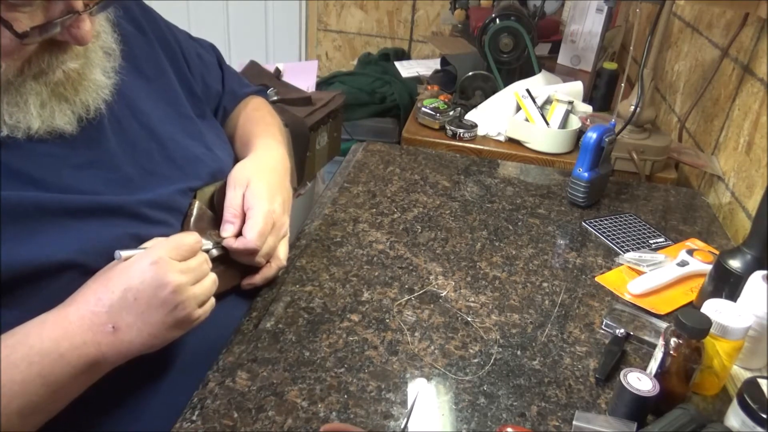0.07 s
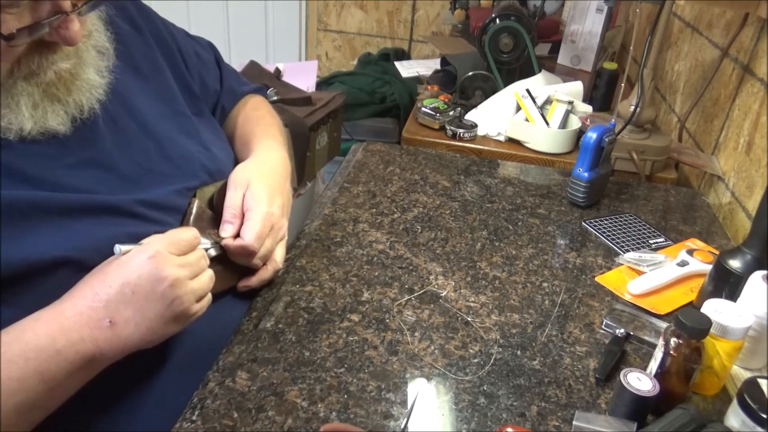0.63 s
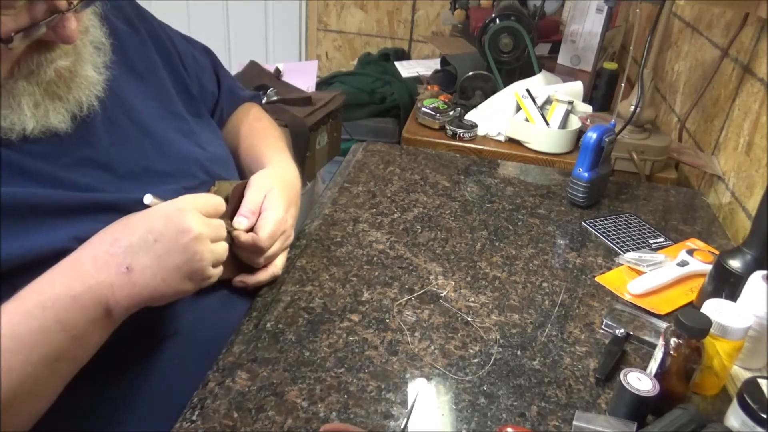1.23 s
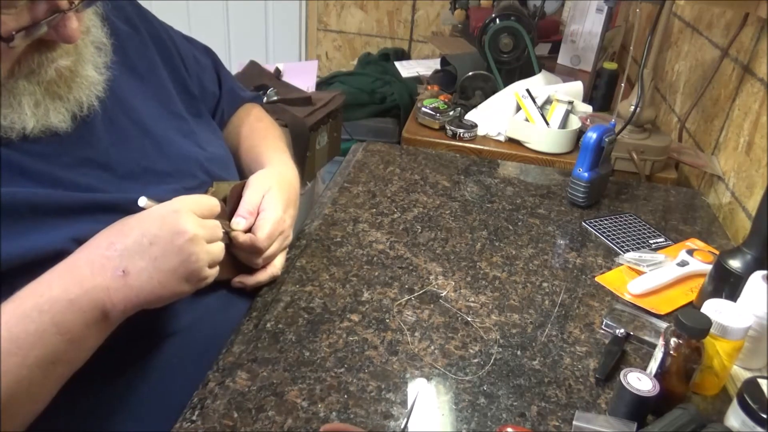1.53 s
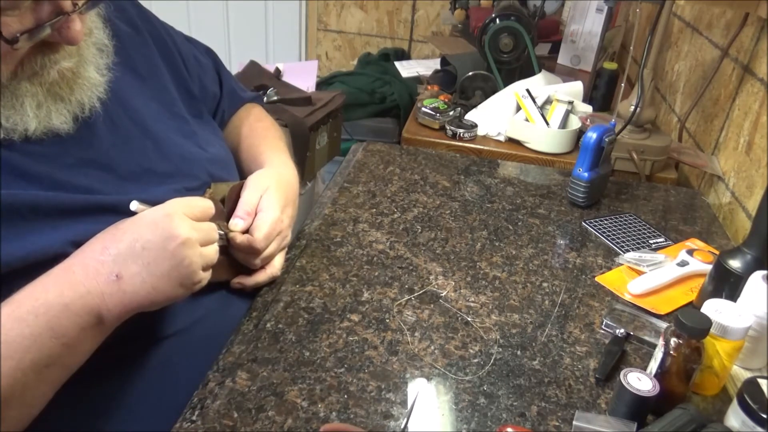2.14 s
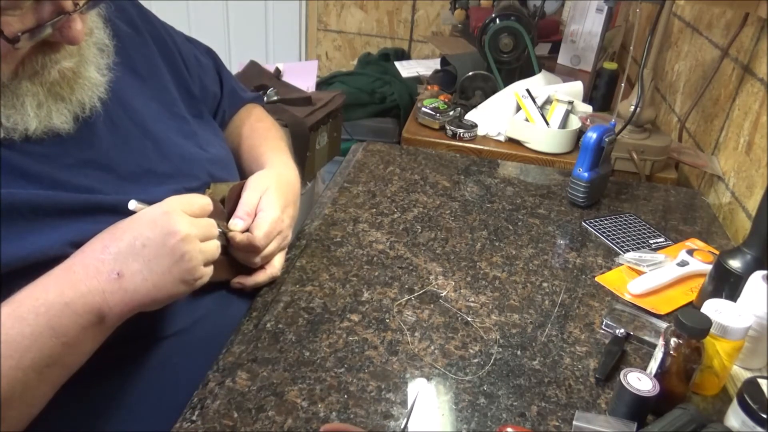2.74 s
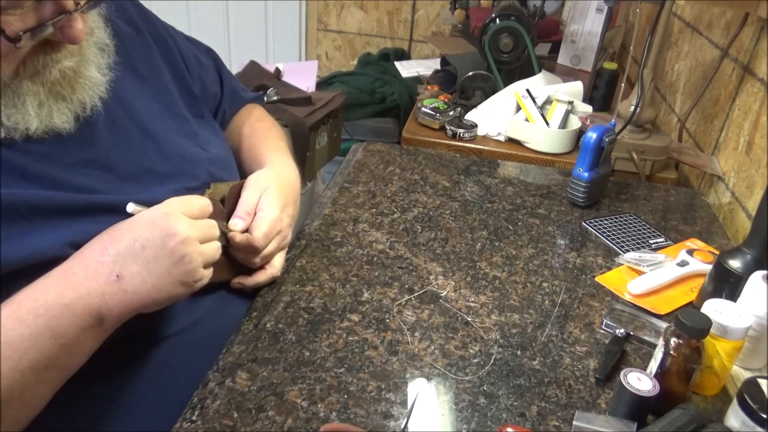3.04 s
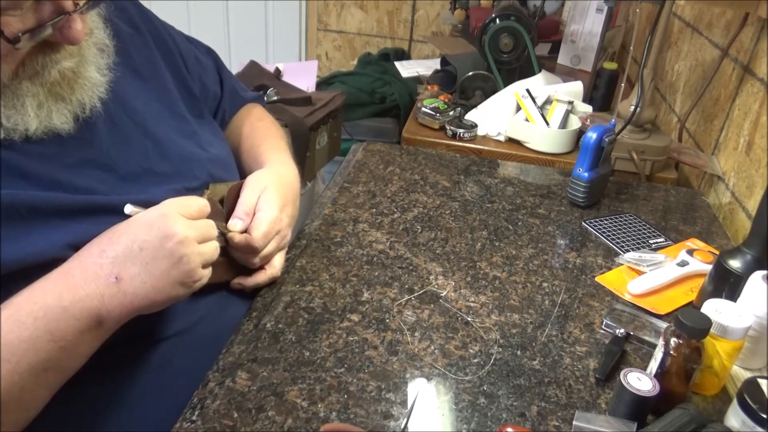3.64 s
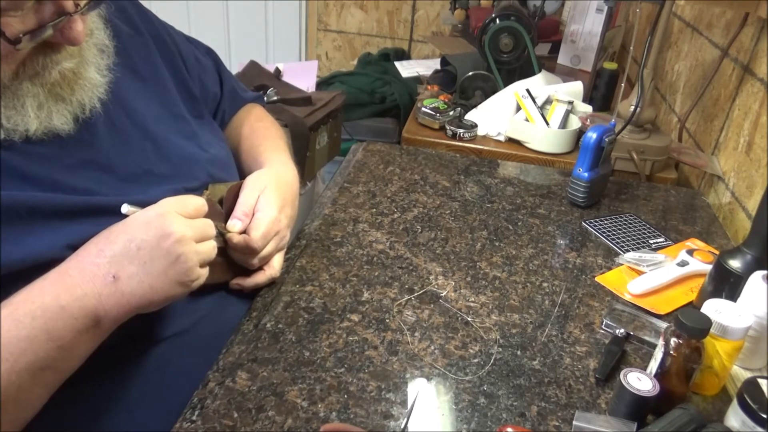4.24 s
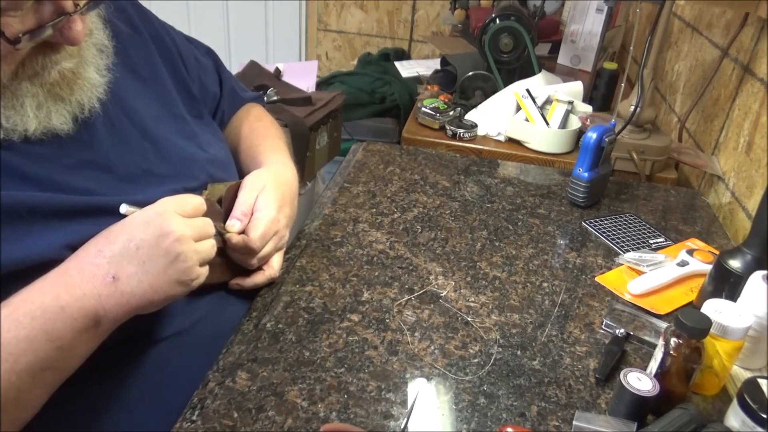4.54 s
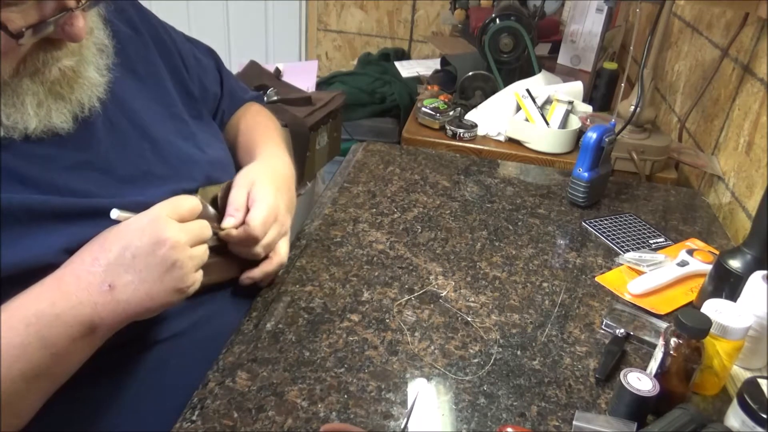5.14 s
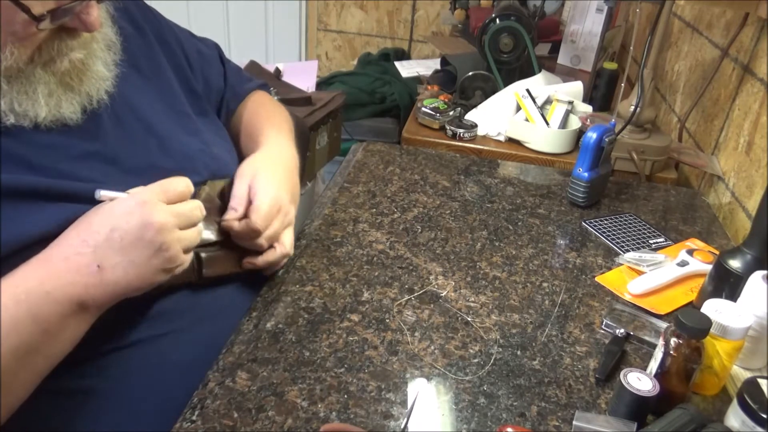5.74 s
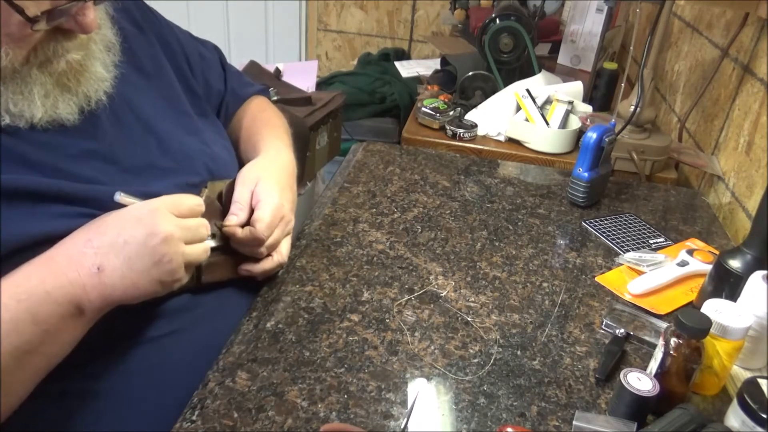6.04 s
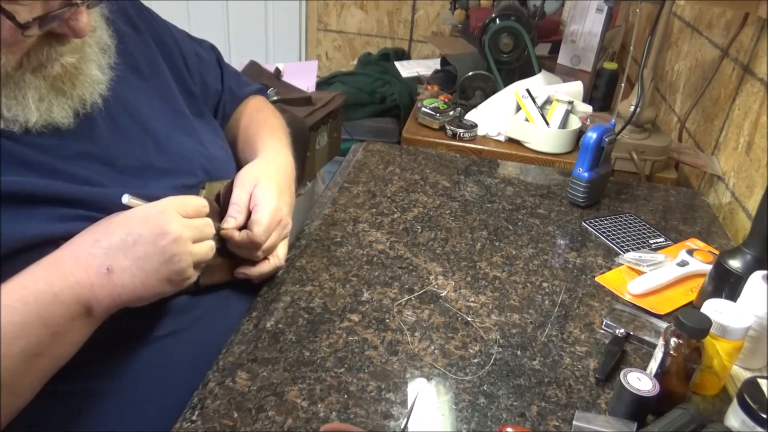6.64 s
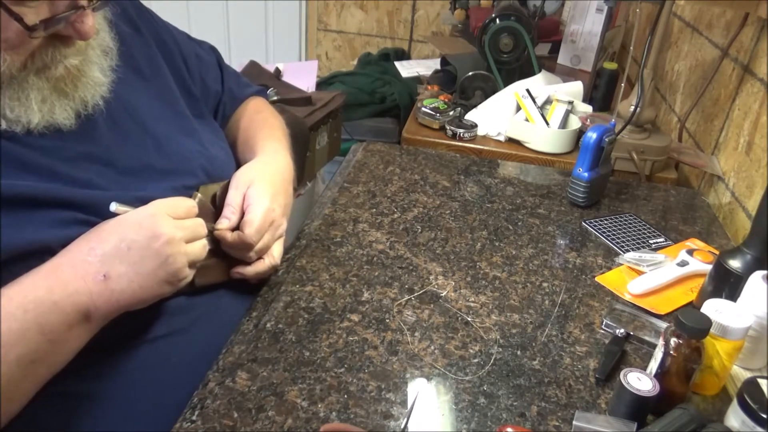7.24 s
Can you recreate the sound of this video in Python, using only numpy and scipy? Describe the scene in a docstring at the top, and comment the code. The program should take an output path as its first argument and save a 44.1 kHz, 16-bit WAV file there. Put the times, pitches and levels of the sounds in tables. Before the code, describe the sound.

Scattered scratchy ticks and several sharp snaps as a blade breaks thread in leather, with light rustling in a small, quiet workshop.

```python
"""A small workshop, at a stone-topped bench: someone unpicks the stitching of a leather piece.
A thin blade sticks and slips over the thread in small dull knocks; now and then a stitch parts
with a sharp snap that rings blade and leather. Hands and leather rub on a shirt.
Behind it: faint hiss, mains hum, a small motor's fluttering whirr and, late, a low drone."""
import sys
import numpy as np
from scipy import signal
from scipy.fft import rfft, irfft
from scipy.io import wavfile

SR = 44100
rng = np.random.default_rng(int(sys.argv[2]) if len(sys.argv) > 2 else 0)


def dump(signal):
    """Clip the signal to [-1, 1] and save it as 16-bit WAV at the path in sys.argv[1]."""
    limited = np.clip(np.atleast_2d(signal).T, -1, 1)
    pcm = np.round(limited * 32767).astype(np.int16)
    wavfile.write(sys.argv[1], SR, pcm)


N = 330308
TIME_S = np.arange(N) / SR

# modes of the held leather, taut thread, blade and blade edge: freq_hz, width_hz, gain_db
LEATHER_MODES = [(462, 91, -14.5), (672, 87.5, -0.5), (780, 97, 0.5), (925, 116, -4.5), (1104, 148, -4),
                 (1796, 137, -8.5)]
THREAD_MODES = [(1940, 90, -2.1), (2520, 430, 0.23), (3140, 340, -2.2), (3660, 360, -2.5)]
BLADE_MODES = [(3170, 490, -13.5), (3990, 790, -9), (4610, 850, -4), (5290, 750, 1), (5697, 730, 0.5),
               (6590, 1230, -10)]
EDGE_MODES = [(7700, 540, -6), (9520, 870, -3.5), (13000, 3300, -12.5)]


def stitch_snaps():
    """A stitch parts: the blade springs free, its edge cracks, the thread twangs, the leather jumps."""
    # stitches and fibres giving way: start_s, ring_db, thump_db, twang_db, crack_db, blade_pitch_ratio
    breaks = [(1.304, -20, -30, -14, -22, 1.1), (1.7988, 1, -8, -9, -8, 1.05),
              (1.8010, 11, 6.5, -16, 8, 0.99), (1.8138, 18, 12, 4, 11.5, 1.04),
              (1.9135, -10, -5, -18, -21, 1.04), (2.5796, -13, -21, -13, -15, 1.0),
              (2.5823, 16, -16, 2, 14, 0.88), (2.584, 22.5, 12, 6, 20, 1),
              (2.9394, 9.5, -0.5, -8.5, 4, 1.005), (3.8268, 20.5, 10, 6.5, 13.5, 0.97),
              (3.8557, -3, -15, -11, -1, 0.93), (3.8576, 5, 9.5, -2.5, 6.5, 1.2),
              (7.3301, 5, -3, -5, -9, 1.24), (7.3344, 24.5, 17.5, 9.5, 10.5, 0.9)]
    out = np.zeros(N)
    for start_s, ring_db, thump_db, twang_db, crack_db, pitch_ratio in breaks:
        force = release(fray=0.39, fray_s=0.0045)
        blade_chirp = disperse(force, hz=4830, width_hz=1880, stages=2)
        edge_chirp = disperse(force, hz=11000, width_hz=1400, stages=3)
        ring = from_db(ring_db) * low_cut(resonate(blade_chirp, BLADE_MODES, pitch_ratio), hz=2020)
        crack = from_db(crack_db) * low_cut(resonate(edge_chirp, EDGE_MODES), hz=4530)
        twang = from_db(twang_db) * low_cut(resonate(force, THREAD_MODES), hz=920)
        thump = from_db(thump_db) * low_cut(resonate(force, LEATHER_MODES), hz=377)
        add(out, start_s, ring + crack + twang + thump)
    return out


def blade_slips(knock_gain_db, scratch_gain_db, steel_gain_db):
    """Stick-slip: each slip knocks the leather, scratches the thread and grazes the steel."""
    # single firm picks at the thread, relative levels: start_s, knock_db, steel_db
    picks = [(0.039, -36, -61), (0.058, -40, -59), (0.078, -38, -57), (0.096, -38.5, -57),
             (0.127, -38, -61), (0.169, -37, -56), (0.206, -38, -61), (0.265, -40, -62),
             (0.325, -39.5, -48), (0.403, -40.5, -52), (0.421, -37, -49), (0.457, -36.5, -50),
             (0.503, -42, -41), (0.636, -37.5, -44), (0.667, -37, -60), (0.737, -41, -42.5),
             (1.099, -56, -44.5), (1.321, -39, -37), (2.168, -34.5, -49), (2.401, -39, -62),
             (2.5, -38.5, -39), (2.996, -41, -53), (3.021, -46, -48.5), (3.342, -56, -43),
             (3.5, -41.5, -35), (3.604, -45, -49), (4.103, -43.5, -52), (4.503, -44.5, -44),
             (5.186, -46, -37), (5.22, -45.5, -33.5), (6.083, -38.5, -57), (6.411, -37, -58),
             (6.462, -41, -48), (6.609, -42.5, -49), (6.738, -40.5, -55), (7.251, -41.5, -47)]
    out = np.zeros(N)
    for start_s, knock_db, steel_db in list(picks) + drag_slips():
        force = release(fray=0.39, fray_s=0.0016)
        graze = release(fray=2.2, fray_s=0.0015)
        grip_ratio = np.exp(0.035 * rng.standard_normal())  # fingers retune leather and thread
        tear = release(fray=2.0, fray_s=0.0023)
        leather = resonate(soft_contact(force, hz=550), LEATHER_MODES, grip_ratio)
        thread = resonate(tear, THREAD_MODES, grip_ratio)
        steel = resonate(graze, BLADE_MODES) + from_db(-2.5) * resonate(graze, EDGE_MODES)
        knock = from_db(knock_db + knock_gain_db) * low_cut(leather, hz=450)
        scratch = from_db(knock_db + scratch_gain_db) * low_cut(thread, hz=1130)
        tick = from_db(steel_db + steel_gain_db) * low_cut(steel, hz=2980)
        add(out, start_s, knock + scratch + tick)
    return out


def drag_slips(gap_jitter=0.2, spread_db=1.5, steel_re_knock_db=-11):
    """A dragged blade lets go at uneven intervals. Returns rows of start_s, knock_db, steel_db."""
    # runs of light slips along the seam: start_s, end_s, slips_per_s, knock_db
    drags = [(0.486, 0.625, 40.4, -43.5), (0.758, 0.78, 85, -45.5), (2.245, 2.37, 45, -43),
             (2.729, 2.83, 24, -43), (4.019, 4.56, 4, -46.5), (6.022, 6.19, 31.3, -44.5),
             (6.547, 6.66, 25, -42.5), (6.787, 7.19, 19, -43)]
    rows = []
    for start_s, end_s, slips_per_s, knock_db in drags:
        gap_draws, level_draws = rng.standard_normal((32, 2)).T
        gaps_s = np.exp(gap_jitter * gap_draws) / slips_per_s
        times_s = start_s + np.cumsum(gaps_s) - gaps_s[0]
        knocks_db = knock_db + spread_db * level_draws
        rows += [(s, db, db + steel_re_knock_db) for s, db in zip(times_s, knocks_db) if s < end_s]
    return rows


def handling(creak_gain_db, rub_gain_db, swish_gain_db):
    """Friction under the hands: the leather creaks and rubs, the shirt swishes."""
    # hand moves, relative levels: start_s, length_s, creak_db, rub_db, swish_db
    moves = [(-0.1, 0.45, -59, -62.5, -66), (0.378, 0.38, -69, -64, -66), (0.72, 0.45, -55, -56, -51.5),
             (2.043, 0.052, -74, -68, -53.5), (2.203, 0.34, -62, -75, -74), (3.298, 0.09, -70, -74, -57),
             (5.045, 0.31, -54, -53, -49.5), (5.22, 0.23, -61, -59, -55), (5.35, 0.72, -57.5, -56.5, -55),
             (5.69, 0.11, -47, -58, -68), (5.81, 0.16, -53, -58, -60), (6.023, 0.22, -68, -62, -63),
             (6.52, 0.48, -60, -64, -66), (6.848, 0.39, -54.5, -57.5, -55.5), (7.24, 0.14, -58, -59, -62)]
    # friction spectra of leather and shirt: freq_hz, density_db
    rub_spectrum = [(50, -32), (200, -20), (300, 2), (450, -7), (800, 2), (1200, -2), (1900, -4.5),
                    (2600, 1.5), (3600, -5), (5500, -8), (9000, -23)]
    swish_spectrum = [(1500, -23), (3000, -6.5), (4800, -1.5), (7000, -3.5), (9400, 1), (11000, -4),
                      (15500, -3.5)]
    power = sum(np.outer(from_db(levels_db), stroke(start_s, length_s)) ** 2
                for start_s, length_s, *levels_db in moves)
    creak_env, rub_env, swish_env = np.sqrt(power)
    creak = rms_one(low_cut(resonate(grains(per_s=300, spread_db=1.5), LEATHER_MODES), hz=434))
    rub = rms_one(colour(grains(per_s=4000, spread_db=3), rub_spectrum))
    rub *= flicker(per_s=36, depth_db=2.3)
    swish = rms_one(colour(grains(per_s=14000, spread_db=4), swish_spectrum))
    swish *= flicker(per_s=30, depth_db=1)
    return (from_db(creak_gain_db) * creak_env * creak
            + from_db(rub_gain_db) * rub_env * rub
            + from_db(swish_gain_db) * swish_env * swish)


def finger_slide(hz=2500, width_hz=260):
    """Skin skids over smooth leather: fine catches ring one narrow resonance."""
    # change of grip: start_s, length_s, level_db
    slide = (5.37, 0.65, -61)
    start_s, length_s, level_db = slide
    scrape = band(grains(per_s=3000, spread_db=3), hz, width_hz)
    return from_db(level_db) * stroke(start_s, length_s) * scrape


def release(fray, fray_s, size=2048):
    """Unit-energy force: a sudden let-go, then a short spray of tearing fibres."""
    fibres = rng.standard_normal(size) * np.exp(-np.arange(size) / SR / fray_s)
    force = fray * fibres / np.linalg.norm(fibres)
    force[0] = 1
    return force / np.linalg.norm(force)


def disperse(x, hz, width_hz, stages):
    """Bending waves in a thin blade arrive smeared: allpasses draw a click into a chirp."""
    radius = np.exp(-np.pi * width_hz / SR)
    poles = [1, -2 * radius * np.cos(2 * np.pi * hz / SR), radius * radius]
    return signal.sosfilt([poles[::-1] + poles] * stages, x)


def soft_contact(force, hz):
    """A soft contact passes mostly the lows of a blow."""
    pole = np.exp(-2 * np.pi * hz / SR)
    return signal.lfilter([1 - pole], [1, -pole], force)


def grains(per_s, spread_db):
    """Tiny friction catches, random in time and size."""
    sizes = from_db(spread_db * np.minimum(rng.exponential(1, N), 4))
    return sizes * rng.choice([-1, 1], N) * (rng.random(N) < per_s / SR)


def stroke(start_s, length_s, rise_share=0.23, fall_share=0.46):
    """Hand speed, 0-1: rises, holds, comes to rest."""
    progress = (TIME_S - start_s) / length_s
    return np.clip(np.minimum(progress / rise_share, (1 - progress) / fall_share), 0, 1)


def flicker(per_s, depth_db):
    """Randomly wandering gain."""
    return from_db(depth_db * np.interp(TIME_S * per_s, np.arange(N), rng.standard_normal(N)))


def resonate(x, modes, pitch_ratio=1):
    """Parallel resonators of alternating sign."""
    out = 0
    for k, (hz, width_hz, gain_db) in enumerate(modes):
        radius = np.exp(-np.pi * width_hz / SR)
        poles = [1, -2 * radius * np.cos(2 * np.pi * hz * pitch_ratio / SR), radius * radius]
        gain = (-1) ** k * from_db(gain_db) * (1 - radius * radius) / 2
        out = out + gain * signal.lfilter([1, 0, -1], poles, x + 1e-18)
    return out


def band(x, hz, width_hz):
    """One resonance, rms 1."""
    return rms_one(resonate(x, [(hz, width_hz, 0)]))


def low_cut(x, hz):
    """High-pass: small things radiate little bass."""
    return signal.sosfilt(signal.butter(2, hz, "high", fs=SR, output="sos"), x)


def from_db(db):
    """Decibels to gain."""
    return 10 ** (np.asarray(db) / 20)


def rms_one(x):
    """Scale to rms 1."""
    return x / np.sqrt(np.mean(x ** 2) + 1e-20)


def at_bins(points, size):
    """Interpolate a curve onto FFT bins over log frequency."""
    known_hz, values = np.transpose(points)
    return np.interp(np.log(np.fft.rfftfreq(size, 1 / SR) + 1e-3), np.log(known_hz), values)


def colour(x, spectrum):
    """Shape noise by a dB spectrum."""
    size = x.shape[-1]
    return irfft(rfft(x) * from_db(at_bins(spectrum, size)), size)


def add(track, start_s, sound):
    """Mix a sound into a track."""
    start = round(start_s * SR)
    track[start:start + len(sound)] += sound[:N - start]


def soften(x, hz, leak_db):
    """The microphone dulls the top treble of the bench sounds; a little leaks past."""
    body = signal.sosfiltfilt(signal.butter(6, hz, fs=SR, output="sos"), x)
    return body + from_db(leak_db) * (x - body)


def from_left(x, shade, lead_s):
    """Source slightly left: that side gets more treble, a hair sooner."""
    hz = np.fft.rfftfreq(N, 1 / SR)
    sides = np.array([[1], [-1]])
    treble = 1 - 1 / (1 + (hz / 3300) ** 6)
    time_shift = np.exp(1j * np.pi * hz * lead_s * sides)
    return irfft(rfft(x) * (1 + shade * treble * sides) * time_shift, N)


def diffuse(size):
    """White stereo noise, correlated like sound from all sides."""
    # left-right likeness: freq_hz, correlation
    likeness = [(60, .98), (130, 1), (280, 0.64), (600, 0.55), (1200, 0.34), (2500, 0.39), (5000, 0.62),
                (12000, 1)]
    mid, side = rfft(rng.standard_normal((2, size)))
    alike = np.clip(at_bins(likeness, size), 0, 1)
    return irfft(np.sqrt((1 + alike) / 2) * mid + np.sqrt((1 - alike) / 2) * side * [[1], [-1]], size)


def workshop(x, bench_s, bench_gain, low_t60_s, high_t60_s, clutter_db, clutter_t60_s):
    """The bench returns one quick echo, nearby clutter a dense cluster, the walls a short tail."""
    # room tail: freq_hz, gain_db
    tail_spectrum = [(200, -6), (700, -4.5), (1500, -2), (3000, -5.5), (5500, -8.5), (9000, -9),
                     (15000, -15)]
    t = np.arange(SR // 2) / SR
    noise = colour(diffuse(len(t)), tail_spectrum)
    treble = signal.sosfiltfilt(signal.butter(1, 2500, "high", fs=SR, output="sos"), noise)
    treble_decay = from_db(-60 * t / high_t60_s)
    walls = (noise - treble) * from_db(-60 * t / low_t60_s) + treble * treble_decay
    clutter = colour(diffuse(len(t)), tail_spectrum) * from_db(clutter_db - 60 * t / clutter_t60_s)
    response = (walls + clutter) * (t > 0.0025) / np.linalg.norm(treble_decay)
    reverb = signal.fftconvolve(x[None], response, axes=1)[:, :N]
    near = x + bench_gain * np.interp(TIME_S - bench_s, TIME_S, x)
    return from_left(near, shade=0.14, lead_s=3.5e-6) + reverb


def room_hiss(level_db):
    """Steady diffuse hiss."""
    # still room: freq_hz, density_db
    spectrum = [(15, -50), (25, -10.5), (114, -4.5), (200, -11.5), (373, -5), (516, -6), (575, -4.5),
                (962, -2.5), (1260, -7.5), (1790, -7.5), (1940, -6.5), (3520, -10), (3820, -10.5),
                (9570, -15), (16000, -20.5)]
    return from_db(level_db) * rms_one(low_cut(colour(diffuse(N), spectrum), hz=38))


def hum_and_drone(drone_hz):
    """Narrow noise bands: mains hum, three higher hums and a low drone that swells near the end."""
    # steady bands: freq_hz, width_hz, level_db
    hum_bands = [(120.1, 3.4, -76), (767, 12, -74), (1250, 53, -66.5), (9550, 150, -70.5)]
    # drone envelope: time_s, level_db
    swell = [(5.4, -95), (6.2, -78), (6.8, -69), (7.25, -64.5), (7.49, -90)]
    air = diffuse(N)
    hum = sum(from_db(level_db) * band(air, hz, width_hz) for hz, width_hz, level_db in hum_bands)
    drone_env = from_db(np.interp(TIME_S, *np.transpose(swell)))
    return hum + drone_env * band(air, drone_hz, width_hz=4)


def motor_whirr(level_db, turn_hz, first_tick_s, tick_decay_s):
    """A small motor ticks once a turn and rings its casing."""
    # casing resonances: freq_hz, width_hz, gain_db
    casing_modes = [(2600, 350, -3), (2960, 210, 8), (3576, 190, 9)]
    since_tick_s = (TIME_S - first_tick_s) % (1 / turn_hz)
    ticks = diffuse(N) * np.exp(-since_tick_s / tick_decay_s)
    return from_db(level_db) * rms_one(resonate(ticks, casing_modes))


def scene():
    """Bench work in the room, over the background."""
    work = stitch_snaps()
    work += handling(creak_gain_db=-3.5, rub_gain_db=-0.5, swish_gain_db=2)
    work += finger_slide()
    work += blade_slips(knock_gain_db=42.5, scratch_gain_db=25, steel_gain_db=31.5)
    work = soften(work, hz=10670, leak_db=-10.5)
    room = workshop(work, bench_s=0.001575, bench_gain=0.12, low_t60_s=0.34, high_t60_s=0.26,
                    clutter_db=4.5, clutter_t60_s=0.077)
    background = room_hiss(level_db=-55.14) + hum_and_drone(drone_hz=136.6)
    background += motor_whirr(level_db=-65, turn_hz=29.97, first_tick_s=0.011, tick_decay_s=0.0036)
    return room + background


def record(dry):
    """Slight fade at the end; steep low-pass at 15.9 kHz."""
    # output gain: time_s, gain_db
    fade = [(7.36, 0.5), (7.49, -2.5)]
    faded = dry * from_db(np.interp(TIME_S, *np.transpose(fade)))
    return signal.sosfilt(signal.ellip(12, 0.2, 80, 15900, fs=SR, output="sos"), faded)


dry = scene()
out = record(dry)
dump(out)
```